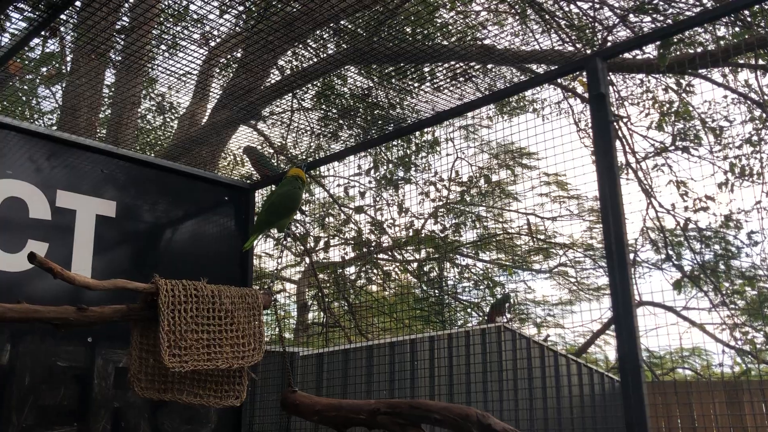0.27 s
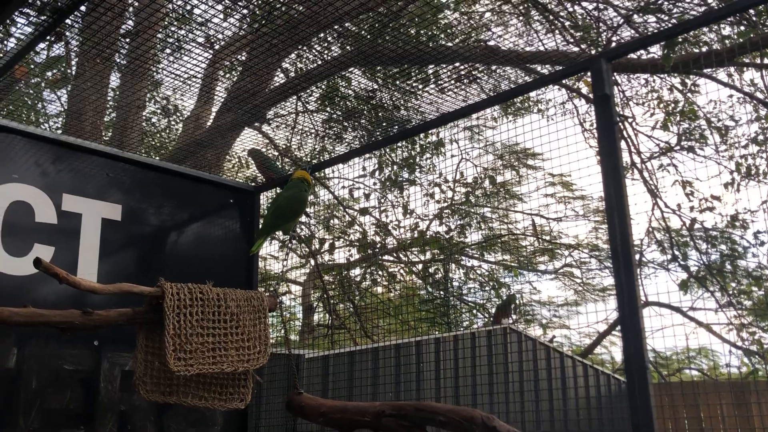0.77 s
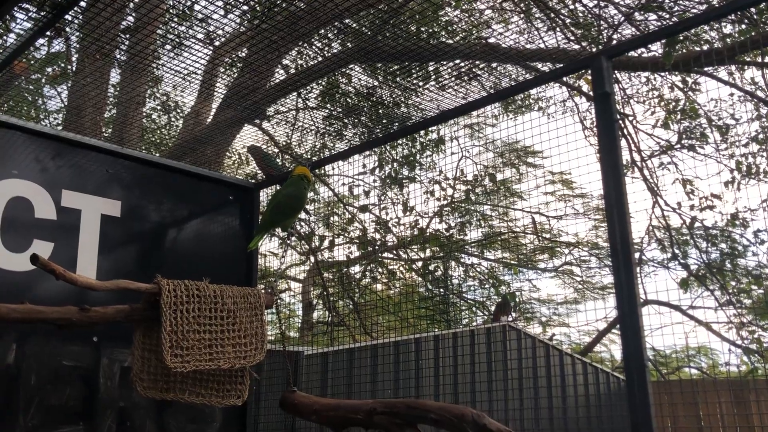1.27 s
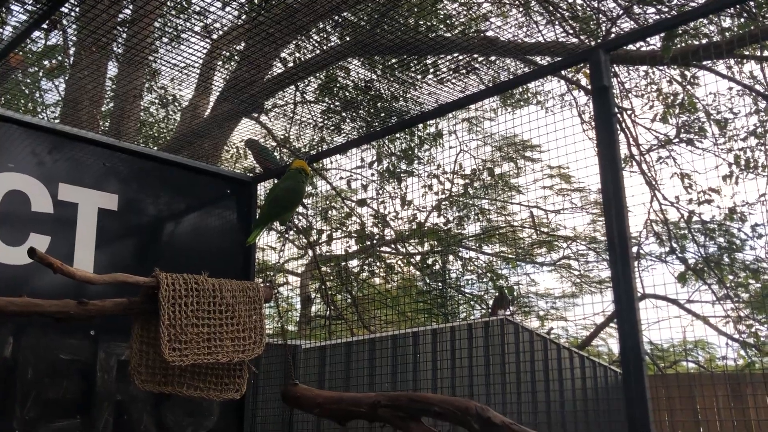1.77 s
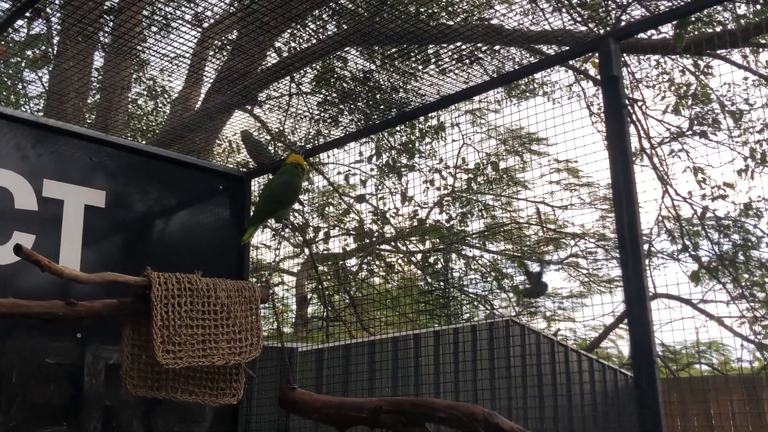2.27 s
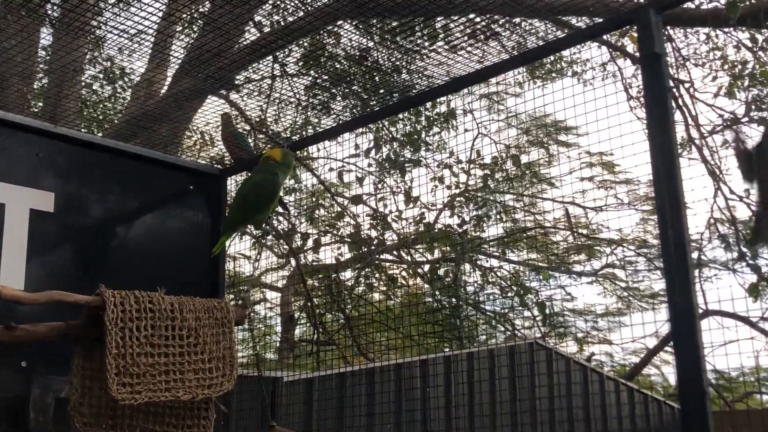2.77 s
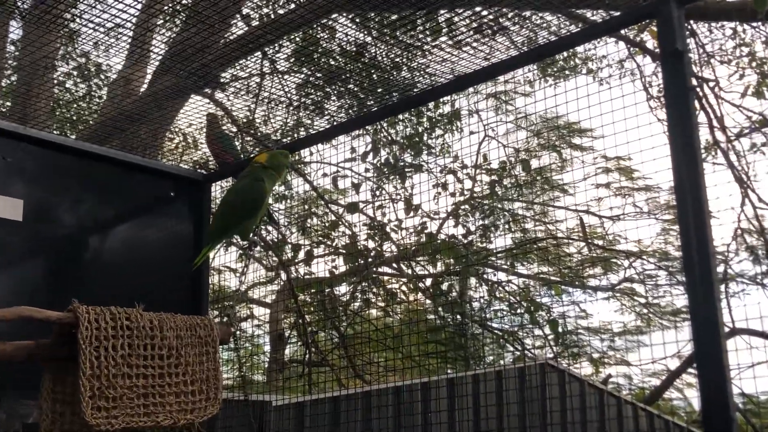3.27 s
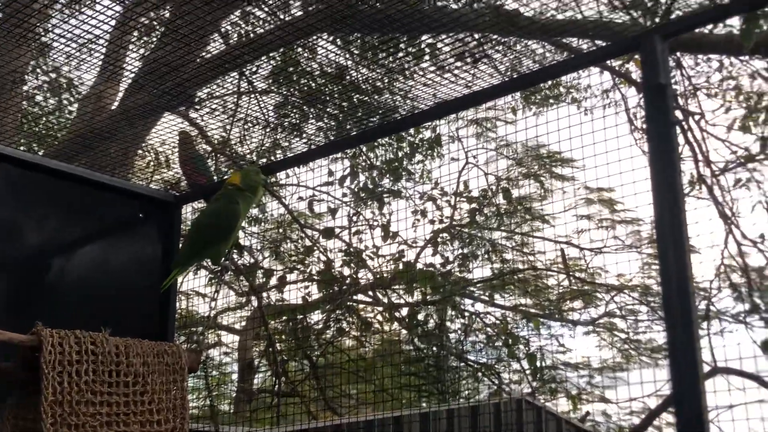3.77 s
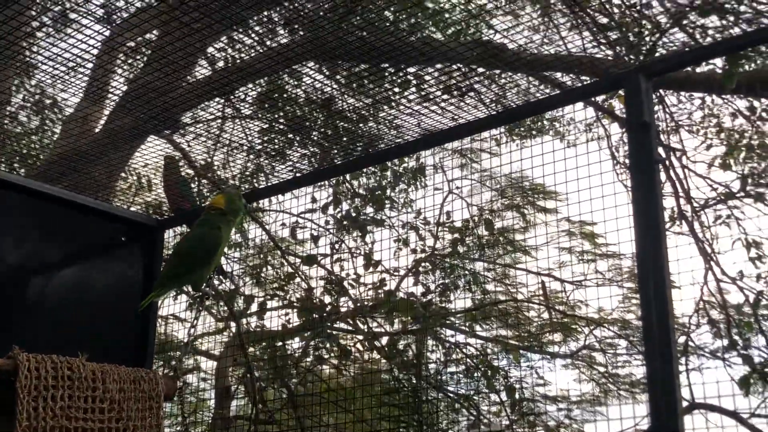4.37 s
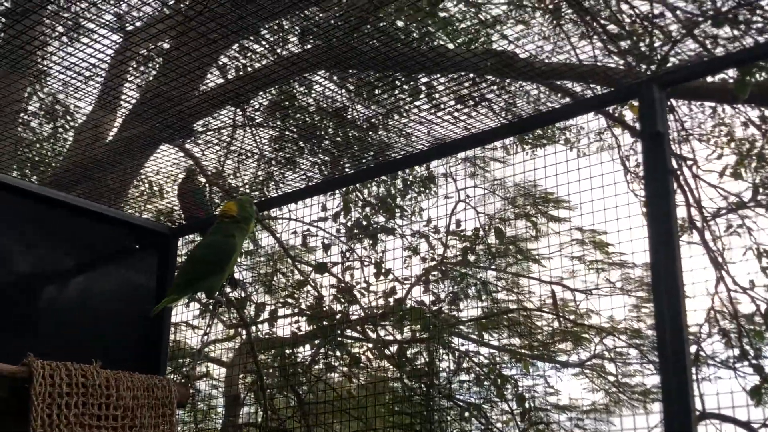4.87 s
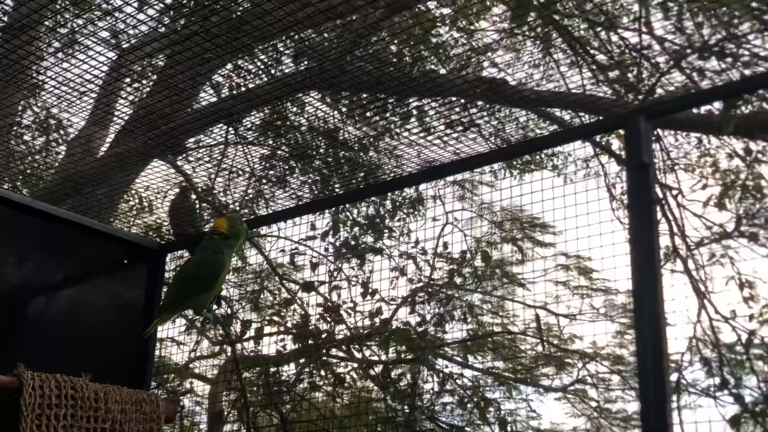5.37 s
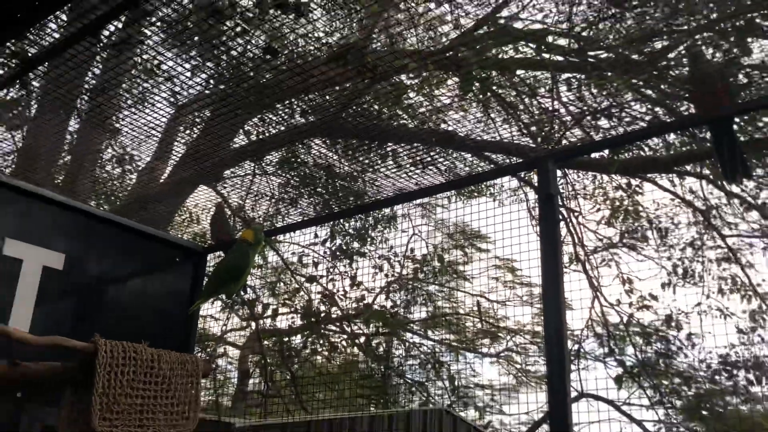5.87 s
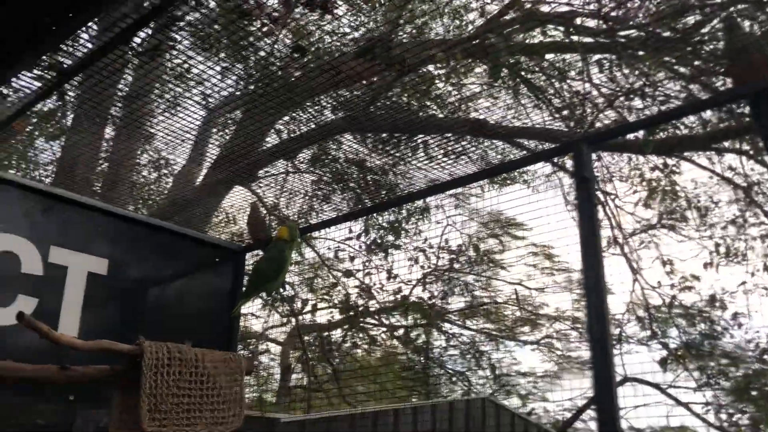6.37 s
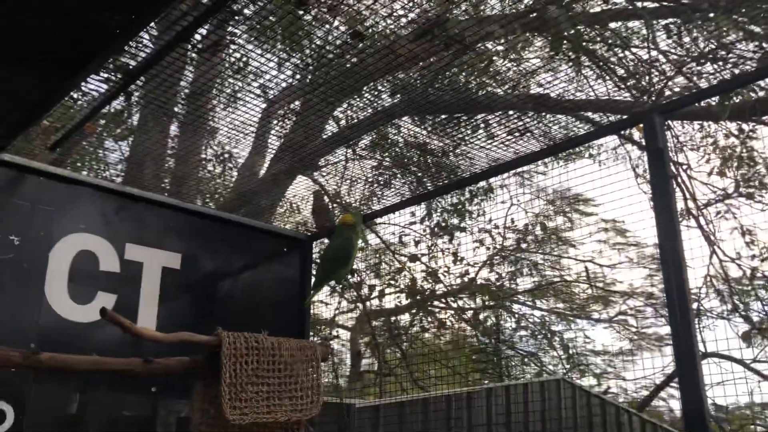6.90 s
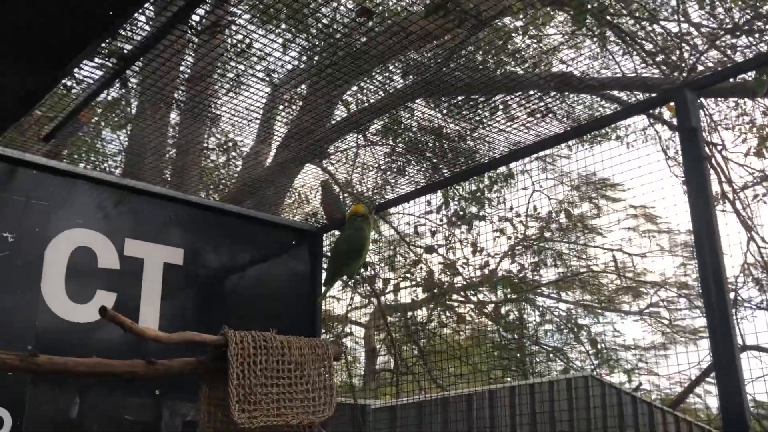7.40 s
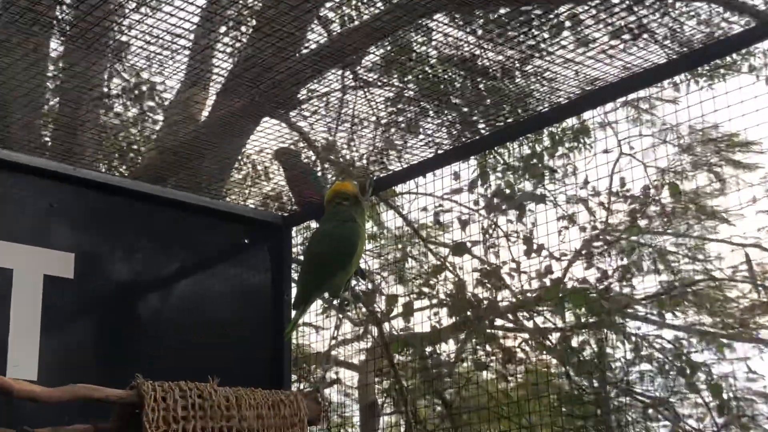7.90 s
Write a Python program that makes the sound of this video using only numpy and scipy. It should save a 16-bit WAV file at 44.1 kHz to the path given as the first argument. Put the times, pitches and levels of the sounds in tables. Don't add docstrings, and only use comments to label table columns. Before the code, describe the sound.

Outdoor mono capture with quiet hush and faint low traffic. Distant whistles and a hoarse screech come first, with one early chirp and a tiny claw tick. Wings flap, then the near parrot's broken mutter grows into a harsh warble, followed by two alternating pairs of leaping wail and rasping gargle. Rising pure chirps from another parrot punctuate it, and fluttering wings close the scene, with short reflections from shed walls and trees.

```python
import sys
import numpy as np
from scipy import signal
from scipy.fft import rfft, irfft, next_fast_len
from scipy.io import wavfile
from scipy.ndimage import uniform_filter1d, map_coordinates

SR = 44100
rng = np.random.default_rng(int(sys.argv[2]) if len(sys.argv) > 2 else 0)


def to_wav(sig):
    pcm = np.clip(np.atleast_2d(sig), -1, 1) * 32767
    pcm = np.round(pcm).astype(np.int16)
    wavfile.write(sys.argv[1], SR, pcm.T)


def gain_from_db(level_db):
    decades = np.asarray(level_db, float) / 20
    return 10 ** decades


N = 358974


def unit(x):
    return x / np.sqrt(np.mean(x ** 2) + 1e-20)


def along(points, hz):
    f, v = np.transpose(points)
    return np.interp(np.log(hz + 1), np.log(f + 1), v)


def track(rows, fade_s=0.0035):
    s, *cols = np.transpose(rows)
    span = slice(round(s[0] * SR), min(N, round(s[-1] * SR)))
    t = np.arange(span.start, span.stop) / SR
    edge = np.clip(np.minimum(t - s[0], s[-1] - t) / fade_s, 0, 1)
    return span, np.sin(np.pi / 2 * edge) ** 2, [np.interp(t, s, c) for c in cols]


def wobble(rate_hz, size):
    knots = rng.standard_normal(int(size * rate_hz / SR) + 4)
    return map_coordinates(knots, [np.arange(size) * rate_hz / SR])


def turns(hz):
    return 2 * np.pi * np.cumsum(hz) / SR


def noise(size):
    return rng.standard_normal(size)


def coloured(x, spectrum, lo_hz=0, hi_hz=22000):
    m = next_fast_len(len(x) + 4096)
    hz = np.fft.rfftfreq(m, 1 / SR)
    gain = gain_from_db(along(spectrum, hz))
    band = (hz >= lo_hz) * (hz < hi_hz)
    return irfft(rfft(x, m) * gain / np.sqrt(np.mean(gain ** 2 * band)), m)[:len(x)]


def syrinx(rows, sac, fade_s, jitter, throb_db, strain=0, flutter=0):
    span, gate, (hz, db) = track(rows, fade_s)
    octave_db, first_db = db + along(sac, 2 * hz), db + along(sac, hz)
    n = len(hz)
    flap = turns(88 * (1 + .1 * wobble(40, n))) - .2 * np.pi
    gate = gate * gain_from_db(flutter * 4 * (np.sin(flap) - 0.4))
    hz = hz * (1 + flutter * .05 * np.cos(flap))
    tension = np.where(hz < 2 * RELAXED_HZ, np.maximum(hz / RELAXED_HZ, 1), 1.2) ** strain
    phase = turns(hz * (1 + jitter * tension * wobble(248.6, n)))
    low = gain_from_db(octave_db + throb_db * np.minimum(wobble(88.8, n), .6)) * np.sin(2 * phase)
    low += gain_from_db(first_db + throb_db * np.minimum(wobble(70, n), .6)) * np.sin(phase)
    k = np.arange(3, 34)[:, None]
    drift = gain_from_db(5.04 * np.minimum([wobble(39.4, n) for _ in k], 1.2))
    even = gain_from_db(1.76 * (-1) ** k * np.clip((640 - hz) / 130, 0, 1))
    blur = (k * hz / 8500) ** 2 * np.array([wobble(350, n) for _ in k])
    partials = np.sin(k * phase + blur + rng.uniform(0, 2 * np.pi, k.shape))
    buzz = np.sum(even * drift * partials * (k * hz < 16000), axis=0)
    return span, np.sqrt(2) * gate * low, gate * buzz * np.sqrt(4 * hz / SR)


def sing(note, sac, flutter=0):
    s, d, a, b, db = note
    glide = [(s, a, db), (s + .5 * d, .35 * a + .65 * b, db), (s + d + 0.0076, b, db)]
    fade_s = min(.009, (d + 0.0087) / 2)
    return syrinx(glide, sac, fade_s, jitter=.015 * min(1, 0.038 / d), throb_db=2.5, flutter=flutter)


# (time [s], length [s], from [Hz], to [Hz], level [dB])
MUTTER_NOTES = [(2.549, .05, 930, 598, -52), (2.509, 0.015, 470, 525, -50.5),
                (2.577, 0.0236, 638, 465, -42.5), (2.642, 0.039, 668, 648, -38),
                (2.682, 0.036, 368, 555.5, -36), (2.71, 0.054, 541.6, 590, -38),
                (2.764, 0.007, 605, 587, -31.5), (2.777, .01, 603, 595, -38), (2.809, .021, 790, 750, -36),
                (2.82, .11, 722, 715, -35.5), (2.929, 0.071, 733, 554, -31),
                (3.005, 0.028, 1179, 571, -28.5), (3.052, 0.027, 1273, 654, -28),
                (3.098, .039, 1417, 467, -26), (3.127, 0.023, 522, 463, -27),
                (3.293, 0.0584, 406, 408, -34), (7.901, 0.0285, 498, 591, -45.5),
                (7.948, 0.044, 1307, 504, -44), (8.094, 0.034, 500, 467, -49.5)]
# (frequency [Hz], gain [dB])
MUTTER_SAC = [(390, -12.5), (500, -5), (700, -2), (1100, 3.5), (1450, -5), (1900, -26)]
# (time [s], throat level [dB], treble lift [dB], noise share [0-1])
MUTTER_BEAK = [
    (2.6, -61.5, -16, 1),
    (2.7, -50.5, -15, 0.67),
    (2.8, -57.5, 0.5, 0),
    (2.9, -54, 1.5, .1),
    (3.0, -51, -1.5, 0.7),
    (3.1, -39, -0.5, 0.99),
    (3.2, -54.5, 1.5, .7),
]
# (frequency [Hz], density [dB per Hz])
MUTTER_THROAT = [(880, -22.5), (1500, 4), (1540, -13), (1920, -5.5), (2630, -24.5), (5600, -18),
                 (6170, -0.5), (7010, -25), (15700, -27.5)]
# (frequency [Hz], width [Hz], lift [dB])
MUTTER_RING = [(5130, 140, 11)]


def mutter():
    parts = [sing(note, MUTTER_SAC) for note in MUTTER_NOTES]
    return parts, [(MUTTER_BEAK, MUTTER_THROAT, MUTTER_RING, 0)]


# (time [s], length [s], from [Hz], to [Hz], level [dB])
WARBLE_NOTES = [(3.349, 0.027, 736, 618, -24), (3.381, 0.031, 507.4, 460.6, -17),
                (3.411, 0.0074, 438, 418, -16.5), (3.423, 0.025, 683, 681, -15),
                (3.454, 0.031, 676, 674, -15), (3.492, 0.017, 672, 660, -16),
                (3.511, 0.016, 562, 433.5, -15), (3.53, 0.017, 472, 460, -21),
                (3.554, 0.048, 486, 456.7, -17), (3.607, 0.014, 620, 703, -21.5),
                (3.627, 0.013, 706, 669, -18), (3.641, 0.012, 486, 528, -17), (3.659, 0.015, 595, 698, -17),
                (3.683, .02, 690, 687, -18.5), (3.711, 0.02, 675, 678, -16),
                (3.739, 0.019, 685, 660, -18.5), (3.761, 0.011, 570, 440, -17.5),
                (3.777, 0.01, 443, 500, -21.5), (3.794, 0.0093, 563, 580, -26),
                (3.441, 0.019, 934, 963, -24.5), (3.479, 0.011, 960, 944, -21),
                (3.672, 0.016, 850, 818, -13), (3.699, 0.012, 825, 844, -14),
                (3.726, 0.02, 895, 817, -12.5)]
# (frequency [Hz], gain [dB])
HARSH_SAC = [(450, -22), (610, -6), (700, -23), (790, -18), (900, 0.5), (1560, 0), (1680, -31),
             (2000, -35.5)]
# (time [s], throat level [dB], treble lift [dB], noise share [0-1])
WARBLE_BEAK = [
    (3.292, -57.5, -1, .15),
    (3.35, -48.5, 0, 0.4),
    (3.42, -43, 0, .6),
    (3.53, -39, 2, 0.7),
    (3.575, -46, -5, .35),
    (3.62, -40.5, 0.5, 0.7),
    (3.75, -40, 1, 0.7),
    (3.818, -45, -1.5, .6),
]
# (frequency [Hz], density [dB per Hz])
WARBLE_THROAT = [(880, -27.5), (1500, 3.5), (1960, -11.5), (2730, -6), (3890, -9), (4170, -28.5),
                 (4420, -28), (6420, -10.5), (8970, -16), (9990, -40.5), (11500, -18.5), (15700, -36.5)]
# (frequency [Hz], width [Hz], lift [dB])
RINGS = [
    [(2800, 190, 2.5), (4030, 200, 6), (6220, 400, 4)],
    [(2550, 130, 7), (3780, 140, 7), (6890, 350, 7.5), (8630, 350, 5.5)],
]


def warble():
    return [sing(note, HARSH_SAC) for note in WARBLE_NOTES], [(WARBLE_BEAK, WARBLE_THROAT, RINGS[0], 0)]


# (time [s], length [s], from [Hz], to [Hz], level [dB])
GARGLE_NOTES = [(4.613, 0.043, 670, 636, -29.5), (4.645, .03, 561, 437, -22.5),
                (4.669, .013, 714, 738, -26), (4.686, .005, 750, 714, -13), (4.696, .021, 497, 442.6, -19),
                (4.721, 0.023, 762, 651, -18), (4.748, .029, 620, 458, -17.5),
                (4.775, 0.009, 703, 732, -17), (4.778, 0.0093, 500, 542, -29),
                (4.789, 0.012, 771, 803, -12), (4.801, .04, 486, 535.6, -17.5),
                (4.837, .01, 772, 748, -12.5), (4.848, 0.0702, 648.3, 621, -20),
                (5.797, .02, 653, 628, -30), (5.816, .03, 642, 450.5, -23), (5.845, .011, 758, 764, -21.5),
                (5.863, .009, 762, 734, -15), (5.873, .023, 517, 439, -19.5), (5.9, .023, 766, 664, -18.5),
                (5.927, .029, 622, 473, -18), (5.956, .023, 766, 779, -16.5),
                (5.982, .033, 500, 540.5, -16), (6.011, .016, 767, 750, -13.5),
                (6.029, .076, 640.5, 621.2, -21)]
# (frequency [Hz], gain [dB])
HOLLOW_SAC = [(560, -43), (800, -8), (900, 1), (1100, 1), (1560, -4)]
# (start [s], end [s], peak throat level [dB], swell [dB])
RASPS = [
    (4.608, 4.929, -27, 8),
    (5.791, 6.115, -28, 5.5),
]
# (frequency [Hz], density [dB per Hz])
GARGLE_THROAT = [(530, -43.5), (900, -9.5), (1560, 0.5), (1720, -11), (2490, -14), (3440, -24),
                 (3780, -19.5), (5480, -40), (7210, -24.5), (9060, -26), (10200, -51), (13000, -28.5),
                 (15700, -36)]


def gargle():
    parts, calls = [], []
    for note in GARGLE_NOTES:
        late = any(start + .185 < note[0] < end for start, end, *_ in RASPS)
        sac = HOLLOW_SAC if note[2] < 522 else HARSH_SAC
        parts.append(sing(note, sac, flutter=1 if late else .35))
    for start, end, db, swell_db in RASPS:
        beak = [(start, db - swell_db - 14, -1.5, .56), (start + 0.08, db - swell_db, -2.5, .56),
                (end - .06, db, 0, .56), (end, db - 4, -2, .56)]
        calls.append((beak, GARGLE_THROAT, RINGS[1], 0))
    return parts, calls


# (start [s], leap [s], drop [s], from [Hz], to [Hz])
CLIMBS = [
    (3.93, 4.08, 4.157, 594, 797),
    (5.075, 5.235, 5.305, 598.5, 825.5),
]
# (time [s], pitch [Hz], voice level [dB], throat level [dB])
SAGS = [
    [(4.141, 995, -45, -25.5), (4.158, 767, -33.5, -22), (4.2, 772, -15.5, -24.5), (4.26, 645, -24, -17.5),
     (4.32, 524.5, -19.5, -23), (4.375, 476.7, -18.5, -28.5), (4.42, 481, -21.5, -24.5),
     (4.47, 547, -18.5, -25), (4.51, 541, -31.5, -32.5)],
    [(5.289, 1003, -45, -23), (5.306, 788, -29, -20), (5.37, 755, -18.5, -22), (5.42, 616.4, -23.5, -18.5),
     (5.48, 517, -17.5, -21.5), (5.55, 485.8, -20, -28), (5.6, 490.7, -22.5, -22.5),
     (5.64, 565.3, -17.5, -27), (5.69, 594, -49, -40.5)],
]
# (time after [s], length [s], from [Hz], to [Hz], level [dB])
UNDER = [
    (-.015, .024, 850, 939, -26.5),
    (-.009, 0.028, 1403, 832, -28),
]
# (frequency [Hz], gain [dB])
WAIL_SAC = [(480, -21.5), (650, -10.5), (780, -15.5), (960, 1.5), (1130, -11), (1350, -9), (1550, -26.5)]
# (frequency [Hz], gain [dB])
LEAP_SAC = [(1200, -13.5), (2000, -9.5), (2400, -0.5), (4000, -1.5)]
# (frequency [Hz], density [dB per Hz])
WAIL_THROAT = [(710, -29.5), (1200, -7.5), (1770, -7), (2260, 3), (2630, -9), (2870, -4.5), (3480, -13),
               (4910, -6.5), (5470, -11.5), (15700, -34)]
RELAXED_HZ, STRAINED_HZ, STRAIN_NOISE = 500, 660, .55
CLIMB_ATTACK_S, CLIMB_START_DB, CLIMB_DB, CLIMB_BEAK_DB = 0.068, -15.5, -19, -27.5
FIFTH, PEAK_RATIO, PEAK_AT, LEAP_DB, LEAP_FALL_DB = 1.5, 1.68, .74, -24, -12


def wail():
    parts, calls = [], []
    for (start, leap, drop, a, b), sag in zip(CLIMBS, SAGS):
        open_s = start + CLIMB_ATTACK_S
        open_hz = 1.015 * (a + (b - a) * CLIMB_ATTACK_S / (leap - start))
        climb = [(start, a, CLIMB_DB + CLIMB_START_DB), (open_s, open_hz, CLIMB_DB), (leap, b, CLIMB_DB)]
        leap_hz, leap_s = FIFTH * b, drop - leap
        peak = [(leap, leap_hz, LEAP_DB),
                (leap + (PEAK_AT - .12) * leap_s, .97 * PEAK_RATIO * leap_hz, LEAP_DB),
                (leap + PEAK_AT * leap_s, PEAK_RATIO * leap_hz, LEAP_DB),
                (drop, leap_hz, LEAP_DB + LEAP_FALL_DB)]
        for rows in (climb, [row[:3] for row in sag]):
            parts.append(syrinx(rows, WAIL_SAC, fade_s=0.0026, jitter=.0048, throb_db=2.5, strain=3.2))
        for jitter in (.01, .025):
            parts.append(syrinx(peak, LEAP_SAC, fade_s=0.006, jitter=jitter, throb_db=5))
        for at, (after, *rest) in zip((leap, drop), UNDER):
            parts.append(sing((at + after, *rest), HARSH_SAC))
        beak = [(start, a, CLIMB_BEAK_DB + CLIMB_START_DB), (open_s, open_hz, CLIMB_BEAK_DB),
                (leap - .012, b, CLIMB_BEAK_DB), (leap, b, CLIMB_BEAK_DB)]
        t, hz, db = np.transpose(beak + [(row[0], row[1], row[3]) for row in sag])
        strain = np.clip((hz - RELAXED_HZ) / (STRAINED_HZ - RELAXED_HZ), 0, 1)
        purity = np.where((t >= leap) & (t <= sag[0][0]), .45, 1)
        rows = np.transpose([t, db, -3 + 4.5 * strain, STRAIN_NOISE * strain * purity])
        calls.append((rows, WAIL_THROAT, [], 1))
    return parts, calls


def ringing(x, rings):
    for hz, width_hz, db in rings:
        x = x + (gain_from_db(db) - 1) * signal.lfilter(*signal.iirpeak(hz, hz / width_hz, SR), x)
    return x


def patchy(x):
    z = signal.stft(x, nperseg=256)[2]
    field = uniform_filter1d(rng.standard_normal(z.shape), size=2, axis=0)
    field = uniform_filter1d(field, size=12, axis=1)
    return unit(signal.istft(z * gain_from_db(4 * unit(field)), nperseg=256)[1][:len(x)])


def throat(buzz, beak, colour, rings, strainable):
    span, gate, (throat_db, lift_db, share) = track(beak, 0.016)
    n = len(gate)
    share = np.clip(share, 0, 1) ** 1.5
    breath = coloured(patchy(noise(n)), [(1000, -5), (3000, -4), (7000, 0)], 6000)
    strained = np.clip(share / STRAIN_NOISE ** 1.3, 0, 1) * strainable
    throb = gain_from_db(1.25 * wobble(110.27, n) + strained * 3.5 * np.minimum(wobble(140, n), .7))
    voiced = np.sqrt(np.abs(uniform_filter1d(buzz[span] ** 2, size=260)))
    breath = breath * (.65 + .35 * np.minimum(unit(voiced), 1.2))
    rasp = throb * (np.sqrt(1 - share) * buzz[span] + np.sqrt(share) * breath)
    body = coloured(ringing(rasp, rings), colour, 1700, 2600)
    treble = signal.sosfiltfilt(signal.butter(2, 3300, "high", fs=SR, output="sos"), body)
    return span, gate * gain_from_db(throat_db) * (body + (gain_from_db(lift_db) - 1) * treble)


def parrot():
    voice, buzz = np.zeros(N), np.zeros(N)
    calls = []
    for parts, beaks in (mutter(), warble(), gargle(), wail()):
        calls += beaks
        for span, low, high in parts:
            voice[span] += low
            buzz[span] += high
    for call in calls:
        span, sound = throat(buzz, *call)
        voice[span] += sound
    return signal.sosfilt(signal.butter(4, 400, "high", fs=SR, output="sos"), voice)


# (time [s], pitch [Hz], tone level [dB])
CHIRP_NOTES = [
    [(0.785, 2690, -47), (0.867, 2980, -26), (0.899, 3047, -20), (0.925, 3033, -20.5), (0.961, 3066, -49),
     (0.965, 3040, -42)],
    [(2.41, 2670, -52), (2.44, 2750, -36), (2.492, 2953, -31.5), (2.512, 2968, -21.5), (2.544, 2978, -30.5),
     (2.558, 2967, -23.5), (2.574, 2975, -39.5), (2.59, 2976, -32.5), (2.605, 2970, -45)],
    [(3.685, 2777, -43), (3.703, 2763, -29.5), (3.725, 2859, -39), (3.745, 2837, -21), (3.757, 2926, -32),
     (3.767, 2942, -22), (3.795, 3004, -14.5), (3.845, 3003, -12), (3.895, 3007, -35.5)],
    [(6.265, 2620, -60), (6.279, 2800, -40.5), (6.327, 2940, -34.5), (6.339, 3016, -20.5),
     (6.373, 3093, -15), (6.401, 3080, -14.5), (6.443, 3074, -32), (6.45, 3100, -41)],
    [(7.43, 2985, -52), (7.44, 2676, -46.5), (7.454, 2756, -31.5), (7.492, 2930, -36.5), (7.504, 2966, -22),
     (7.538, 3066, -14.5), (7.566, 3055, -11.5), (7.6, 3078, -33)],
]
CHIRP_OCTAVE_DB = [-14, -9, -9.5, -18, -15]
# (multiple, level re octave [dB])
OVERTONES = [(3, -13), (4, -23.5), (5, -17.5)]


def chirps():
    out = np.zeros(N)
    for rows, octave_db in zip(CHIRP_NOTES, CHIRP_OCTAVE_DB):
        span, gate, (hz, tone_db) = track(rows, 0.007)
        n, effort_db = len(gate), tone_db - tone_db.max()
        hz = uniform_filter1d(hz, size=700, mode="nearest")
        phase = turns(hz * (1 + .002 * wobble(200, n)))
        upper = gain_from_db(-.16 * effort_db + 1.6 * wobble(40, n)) * np.sin(2 * phase)
        for k, db in OVERTONES:
            upper += gain_from_db(-.25 * effort_db + db + 1.4 * wobble(32.0, n)) * np.sin(round(k) * phase)
        tone = np.sin(phase) + gain_from_db(octave_db) * upper
        out[span] += np.sqrt(2) * gate * gain_from_db(tone_db + .4 * wobble(61.0, n)) * tone
    return out


# (frequency [Hz], level [dB])
FAR_OCTAVE = [(2200, -11.5), (2600, -5), (3300, -14), (4200, -21)]


def whistle(rows, db, jitter):
    span, gate, (hz,) = track(rows, 0.005)
    phase = turns(hz * (1 + jitter * wobble(159.6, len(hz))))
    flutter = gain_from_db(2.5 * wobble(60, len(hz)))
    tone = np.sin(phase) + gain_from_db(along(FAR_OCTAVE, hz)) * np.sin(2 * phase)
    return span, gate * flutter * gain_from_db(db) * tone


# (time [s], length [s], from [Hz], to [Hz], level [dB])
FAR_WHISTLES = [(0.066, 0.045, 3570, 3710, -53), (0.112, 0.19, 3423, 3295, -52),
                (0.135, 0.2, 3050, 3170, -57.5), (.44, 0.035, 2220, 2310, -57),
                (.49, 0.036, 2550, 2580, -59), (.53, 0.16, 2800, 3410, -59), (0.627, 0.11, 2015, 2140, -51),
                (.995, 0.057, 3940, 4720, -53), (1.034, 0.13, 4170, 4070, -48.5),
                (1.093, 0.14, 3430, 3390, -50.5), (1.092, 0.11, 2800, 2770, -53),
                (1.929, 0.11, 2800, 3540, -57.5), (2.001, 0.11, 2535, 2600, -63),
                (2.06, 0.28, 3620, 3280, -55.5), (6.764, 0.057, 3100, 2610, -56.5),
                (.045, 0.13, 2590, 2560, -60), (1.85, .07, 2340, 2310, -60), (6.68, .07, 3140, 3320, -56),
                (7.025, .035, 3150, 3500, -53)]
# (time [s], length [s], from
# [Hz], to [Hz], level [dB])
CHATTER = [(1.232, 0.054, 2120, 2140, -48.5), (1.275, 0.11, 2350, 2610, -49), (2.64, 0.14, 7300, 6550, -54),
           (1.41, 0.123, 2560, 2620, -50.5), (1.31, .2, 3350, 3900, -56), (1.43, 0.056, 6300, 6350, -54),
           (1.5, .17, 3800, 4250, -58.5), (1.09, 0.16, 2750, 2700, -60), (1.05, 0.1, 4650, 4600, -58),
           (7.318, .11, 3900, 4220, -41.5), (7.29, 0.077, 2720, 2800, -48), (7.4, .065, 3600, 3200, -44),
           (7.415, 0.061, 6350, 6250, -44.5)]
# (time [s], pitch [Hz])
WAVY = [
    (7.088, 2800),
    (7.116, 2620),
    (7.161, 2790),
    (7.19, 2300),
]
# (start [s], turn [s], end [s], level at turn [dB], swell into turn [dB])
SCREECHES = [
    (1.06, 1.453, 1.65, -51, 12.5),
    (7.272, 7.362, 7.5, -46.5, -4.5),
]
# (frequency [Hz], density [dB per Hz])
HOARSE = [
    [(1060, -44), (1800, -28), (2640, -0.5), (4180, -10.5), (4950, -6.5), (5860, -17), (6520, -11),
     (10300, -21.5), (13100, -27), (15000, -39)],
    [(1060, -55), (1800, -19), (2500, -22), (2860, -1.5), (3630, -12), (4040, 2), (5040, -27), (5650, -2.5),
     (7120, -25), (8130, -8.5), (15000, -45)],
]


def far_birds():
    out = np.zeros(N)
    calls = []
    for table, jitter in [(FAR_WHISTLES, .008), (CHATTER, .016)]:
        for s, d, a, b, db in table:
            calls.append(([(s, a), (s + 0.53 * d, .25 * a + .75 * b), (s + d, b)], db, jitter))
    s, hz = np.transpose(WAVY)
    t = np.arange(s[0], s[-1], .002)
    knots = np.arange(len(s))
    place = np.interp(t, s, knots)
    eased = np.floor(place) + np.sin(np.pi / 2 * (place % 1)) ** 2
    calls.append((np.transpose([t, np.interp(eased, knots, hz)]), -46, .003))
    for call in calls:
        span, tone = whistle(*call)
        out[span] += tone
    for (start, loud, end, db, swell_db), colour in zip(SCREECHES, HOARSE):
        rows = [(start, db - swell_db), (max(start, loud - 0.13), db - swell_db), (loud, db),
                (end, db - 112 * (end - loud))]
        span, gate, (level_db,) = track(rows, 0.044)
        n = len(level_db)
        out[span] += gate * gain_from_db(level_db + 1.5 * wobble(45, n)) * coloured(noise(n), colour, 3330, 5310)
    return out


# (time [s], whoosh level [dB], feather hiss re whoosh [dB])
WING_BEATS = [(0.079, -40, -15), (0.149, -55.5, -8.5), (2.201, -46.5, -6), (2.321, -45, -15.5),
              (2.44, -47, -11), (2.565, -38, -15.5), (6.739, -44.5, -13.5), (6.831, -47, -3),
              (6.879, -37, -11.5), (6.969, -37, -11.5), (7.019, -35.5, -11), (7.069, -41.5, -15),
              (7.199, -45.5, -14), (7.735, -48.5, -10), (7.795, -35, -20.5), (7.879, -35.5, -17),
              (7.919, -37, -30), (7.983, -36, -20.5), (8.104, -42.5, -29)]
# (frequency [Hz], density [dB per Hz])
WHOOSH = [(150, -28), (250, -8.5), (593, 0.5), (816, 4), (1220, 1.5), (6000, -16), (7800, -26),
          (13200, -120)]
# (frequency [Hz], density [dB per Hz])
FEATHERS = [(2350, -18), (4000, -7), (5940, -7), (9010, -20.5), (15700, -19)]
# (time [s], peak level [dB])
CLAW_TICKS = [
    (1.715, -31),
]


def wings():
    out = np.zeros(N + SR)
    t = np.arange(SR // 5) / SR
    n = len(t)
    for s, db, hiss_db in WING_BEATS:
        hiss = np.exp(-((t - .1) / 0.032) ** 2) * coloured(noise(n), FEATHERS, 7000, 12000)
        whoosh = np.exp(-((t - .1) / 0.077) ** 2) * coloured(noise(n), WHOOSH, 450, 2700)
        beat = gain_from_db(db - 13 + np.clip(2 * wobble(50, n), -4, 2)) * (whoosh + gain_from_db(hiss_db) * hiss)
        first = round((s - .08) * SR)
        cut = max(0, -first)
        out[max(0, first):][:n - cut] += beat[cut:]
    t = np.arange(300) / SR
    mesh = [(300, -2), (2000, 5.0), (8000, -18), (12000, -42), (16000, -80)]
    for s, db in CLAW_TICKS:
        click = coloured(noise(len(t)) + 4 * (t == 0), mesh)
        out[round(s * SR):][:len(t)] += gain_from_db(db - 3.5 - 60 * t / 0.0067) * click
    return out[:N]


# (time [s], air level [dB], rumble level [dB])
AIR_DB = [
    (0.04, -59.5, -69),
    (2.11, -59.5, -67.5),
    (5.3, -59.5, -60),
    (7.55, -57.5, -64.5),
    (8.14, -57, -67),
]
# (frequency [Hz], density [dB per Hz])
AIR = [(41, -35.5), (70, -2.5), (514, -21), (550, -18.5), (1460, -25), (1590, -25), (2040, -32),
       (2680, -30), (3370, -27), (15700, -53.5)]
# (frequency [Hz], density [dB per Hz])
RUMBLE = [(15, -46.5), (25, -13), (48, -1.5), (90, 2), (120, -34), (200, -120)]
# (time [s], pitch [Hz], level [dB])
ENGINE = [
    (3.4, 40, -80),
    (3.9, 40, -65),
    (4.8, 46, -66),
    (5.4, 56, -62.5),
    (7.4, 55, -59),
    (8.14, 50, -60),
]


def air():
    span, gate, (air_db, rumble_db) = track(AIR_DB, 0.0029)
    n, out = len(gate), np.zeros(N)
    hush = gain_from_db(air_db + 0.74 * wobble(1.6, n)) * coloured(noise(n), AIR, 117.6, 570)
    rumble = gain_from_db(rumble_db + 0.93 * wobble(2, n)) * coloured(noise(n), RUMBLE, 25, 70)
    out[span] = gate * (hush + rumble)
    span, gate, (hz, db) = track(ENGINE, .01)
    n = len(gate)
    hum = np.sin(turns(hz * (1 + .06 * wobble(4.6, n))))
    out[span] += gate * gain_from_db(db + 3 + 2 * wobble(6.5, n)) * hum
    return out


# (frequency [Hz], T60 [s])
YARD_T60 = [(300, 0.3), (1500, 0.34), (3000, 0.41), (8000, 0.3), (15000, 0.016)]


def yard(x):
    hz, t, z = signal.stft(noise(SR * 2 // 3), SR, nperseg=256)
    decay = gain_from_db(-60 * t / along(YARD_T60, hz)[:, None])
    tail = signal.istft(z * decay, SR, nperseg=256)[1]
    return signal.fftconvolve(np.pad(x, (350, 0)), tail / np.linalg.norm(tail))[:N]


def scene():
    near, second, far = parrot(), chirps(), far_birds()
    echoes = yard(gain_from_db(-11.5) * near + gain_from_db(-8.0) * far) + gain_from_db(-15.5) * yard(second)
    return (near + second + gain_from_db(-3.5) * far + echoes + wings() + air())[None]


def top_cut(x):
    return signal.sosfilt(signal.butter(12, 15850, fs=SR, output="sos"), x)


def record(dry):
    soft = dry / (1 + (dry / .68) ** 4) ** .25
    return top_cut(soft * (np.arange(N) > 0.034 * SR))


dry = scene()
out = record(dry)
to_wav(out)
```